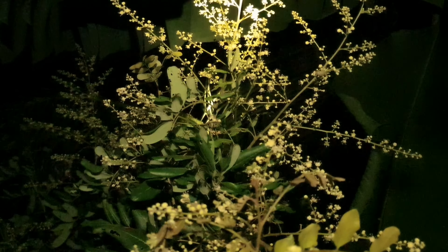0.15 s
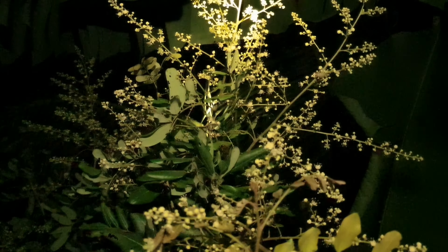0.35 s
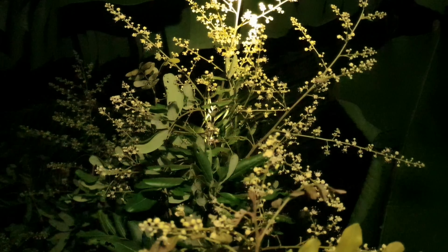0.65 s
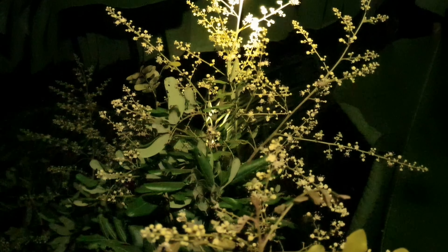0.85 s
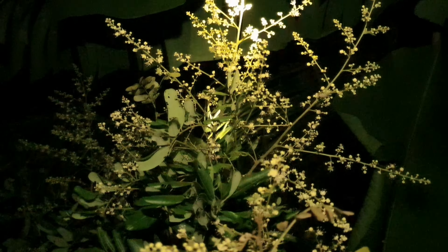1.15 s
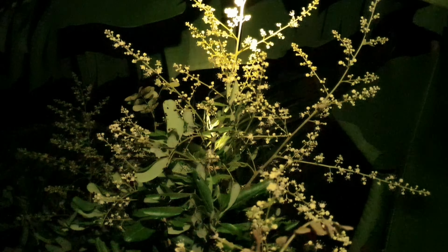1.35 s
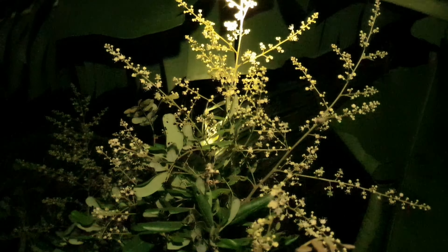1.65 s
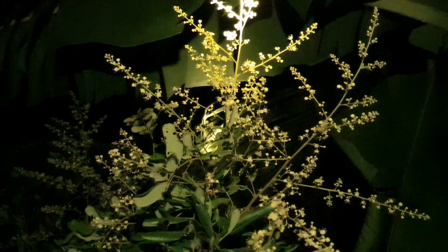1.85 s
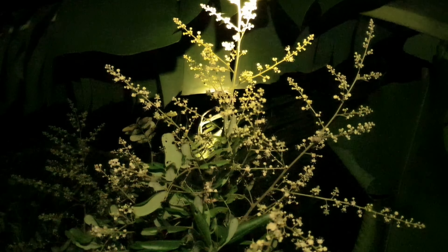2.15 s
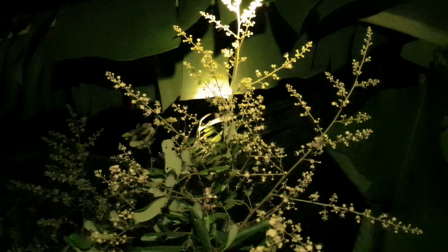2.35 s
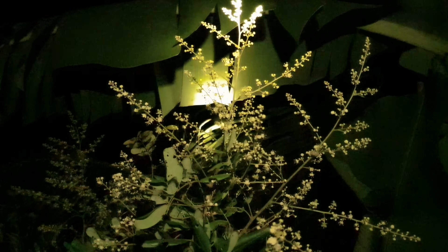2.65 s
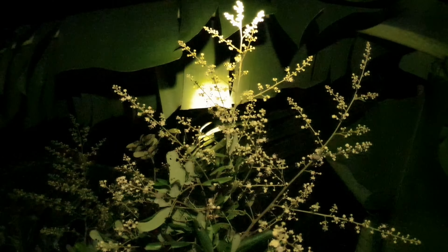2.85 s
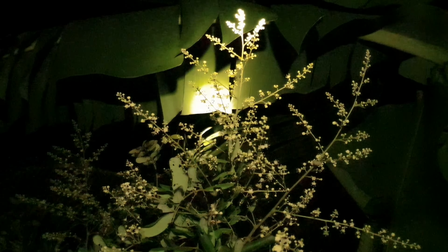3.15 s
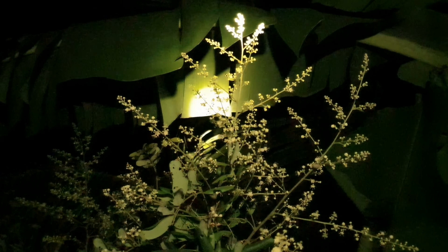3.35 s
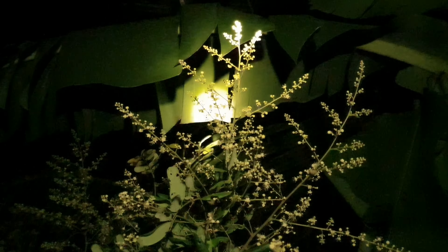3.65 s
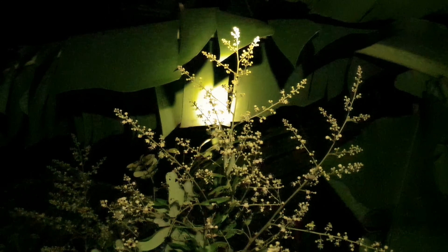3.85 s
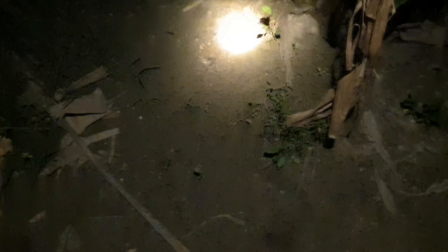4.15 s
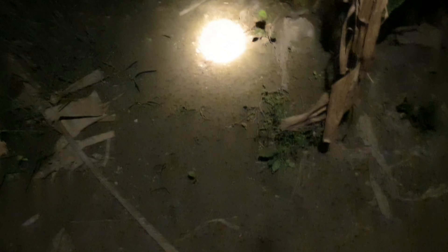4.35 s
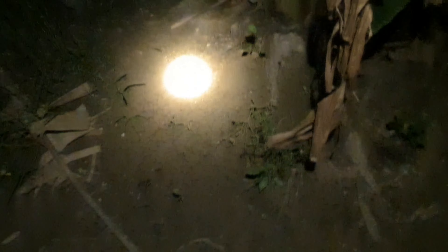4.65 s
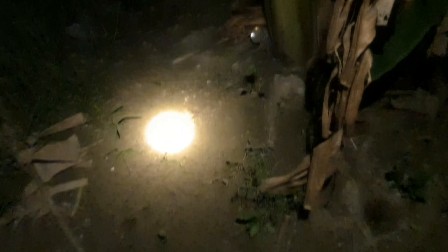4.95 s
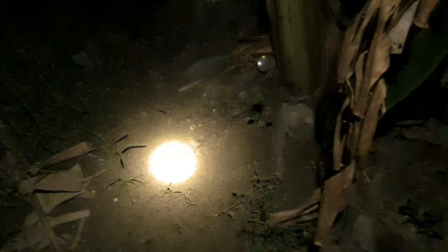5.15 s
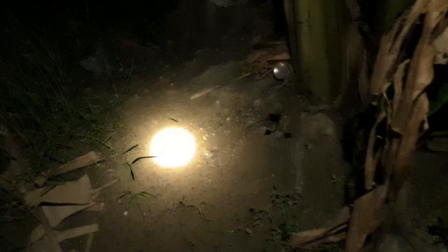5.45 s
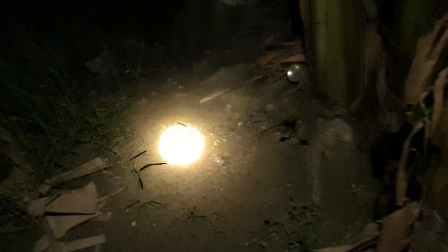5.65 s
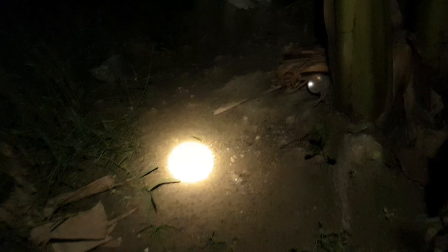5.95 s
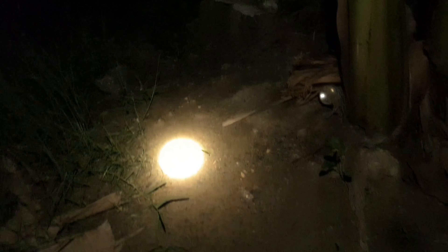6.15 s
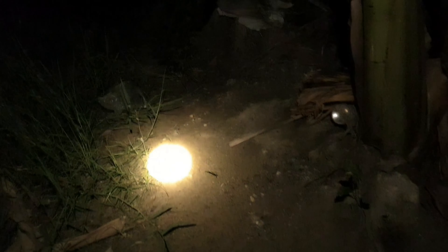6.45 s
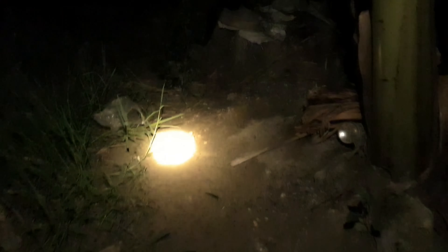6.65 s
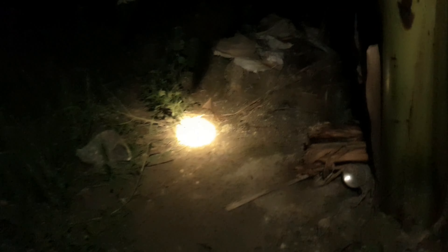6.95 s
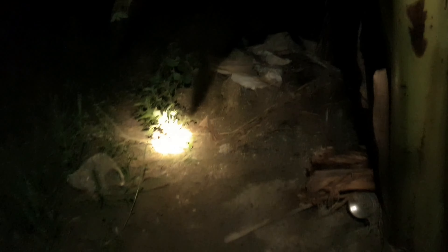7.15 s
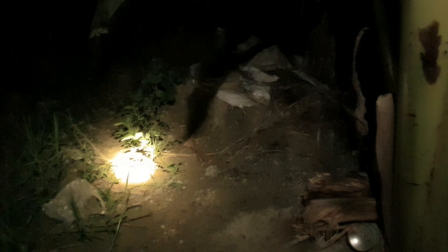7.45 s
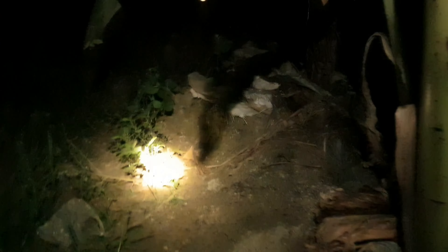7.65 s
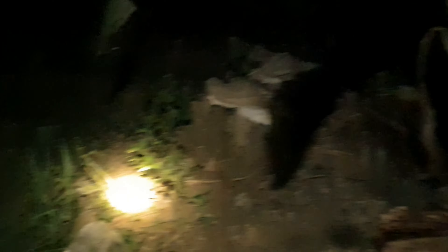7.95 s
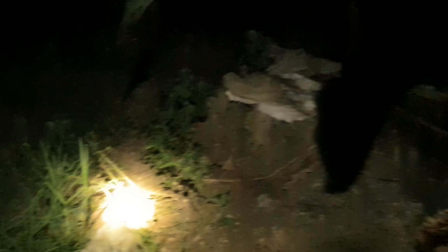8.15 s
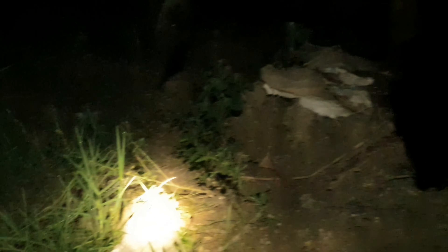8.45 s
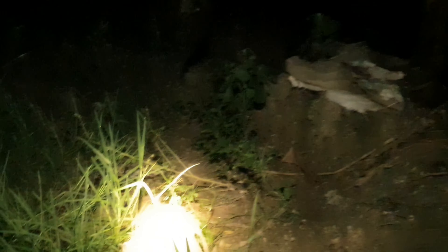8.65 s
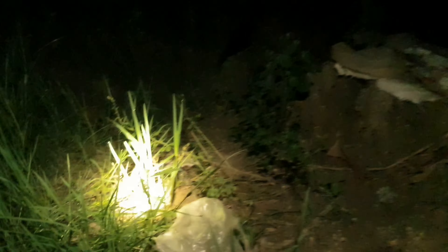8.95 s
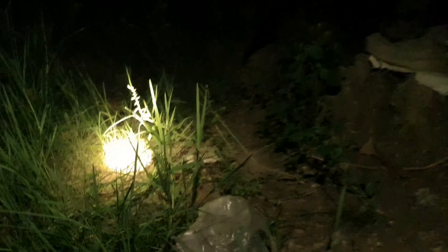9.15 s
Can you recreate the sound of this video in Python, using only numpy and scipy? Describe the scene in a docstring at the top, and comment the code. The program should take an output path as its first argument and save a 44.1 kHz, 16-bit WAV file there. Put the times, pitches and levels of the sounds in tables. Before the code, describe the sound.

Crickets trill and buzz outdoors at night over a distant engine; after a short gap, feet shuffle through dry leaves and a far dog barks.

```python
"""A garden at night, from two microphone spots. From the start, over night air, a far road and engine,
mole crickets trill near 2 kHz, coneheads buzz at 11 kHz and a katydid chirps at 7 kHz, all with their
wings; at 2 s another mole cricket briefly joins the chorus. At 4 s a short silence leads to the second
spot, where the chorus goes on and a small bush cricket lisps. Soon feet shuffle in dry leaves, snap
twigs and thud on the earth, and more mole crickets join in. Near 6 s and from 8.6 s a far dog barks."""
import sys
import numpy as np
from scipy import signal
from scipy.fft import rfft, irfft, next_fast_len
from scipy.io import wavfile
from scipy.ndimage import map_coordinates

SR = 44100
rng = np.random.default_rng(int(sys.argv[2]) if len(sys.argv) > 2 else 0)


def to_wav(sig):
    """Store sig (one row per channel, or 1-D mono) as 16-bit WAV at the path in sys.argv[1].

    Samples outside -1..1 are clipped; the rate is SR.
    """
    pcm = np.clip(np.atleast_2d(sig), -1, 1) * 32767
    pcm = np.round(pcm).astype(np.int16)
    wavfile.write(sys.argv[1], SR, pcm.T)  # frames by channels


N = 409688
TIME = np.arange(N) / SR


def gain_of(db):
    """Decibels to amplitude."""
    return 10 ** (np.asarray(db) / 20)


def unit_rms(x):
    """Scales to rms 1."""
    return x / np.sqrt(np.mean(x ** 2) + 1e-20)


def at_hz(points, hz):
    """Reads a table on a log-frequency axis."""
    f, value = np.transpose(points)
    return np.interp(np.log(hz + 1), np.log(f + 1), value)


def level(rows):
    """A curve (t/s, level/dB) as a gain for every sample."""
    return gain_of(np.interp(TIME, *np.transpose(rows)))


def colour(x, spectrum):
    """Filters x by a spectrum (f/Hz, gain/dB) and scales it to rms 1."""
    n = x.shape[-1]
    size = next_fast_len(n)
    gains = gain_of(at_hz(spectrum, np.fft.rfftfreq(size, 1 / SR)))
    return unit_rms(irfft(rfft(x, size) * gains, size)[..., :n])


def drift(per_s):
    """A smooth random curve of rms near 1 that changes about per_s times a second."""
    knots = rng.standard_normal(65536)
    coarse = TIME[::4 if per_s > 1000 else 32]
    return np.interp(TIME, coarse, map_coordinates(knots, [coarse * per_s], order=3, mode="wrap"))


def pan(balance_db):
    """Left and right microphone gains of mean power 1; positive is left."""
    return unit_rms(gain_of([[balance_db / 2], [-balance_db / 2]]))


def add(mix, s, sound):
    """Mixes a sound in at time s."""
    part = mix[..., round(s * SR):][..., :sound.shape[-1]]
    part += sound[..., :part.shape[-1]]


def foliage(x, t60, wet_db):
    """Leaves and trunks scatter a sound, differently for each microphone."""
    t = np.arange(SR // 2) / SR
    tail = rng.standard_normal((2, len(t))) * gain_of(-60 * t / t60)
    tail *= gain_of(wet_db) / np.linalg.norm(tail[0])
    tail[:, 0] += 1  # the direct path
    return signal.oaconvolve(x[None], tail / np.linalg.norm(tail[0]), axes=1)[:, :N]


# likeness of the two microphones: f/Hz, correlation
LIKENESS = [(25, .93), (60, .975), (125, .95), (250, .45), (500, -.4), (1000, -.3), (2000, -.15), (5000, 0)]


def ambience(spectrum):
    """Noise from all round: alike at both microphones only in the bass."""
    size = next_fast_len(N)
    left, other = rfft(rng.standard_normal((2, size)))
    same = np.clip(at_hz(LIKENESS, np.fft.rfftfreq(size, 1 / SR)), -1, 1)
    right = same * left + np.sqrt(1 - same ** 2) * other
    return colour(irfft(np.array([left, right]), size)[:, :N], spectrum)


# far engine from each spot: t/s, level/dB
ENGINE_LEVELS = [
    [(0, -48), (.7, -45), (1.5, -47.5), (2.5, -48.5), (3.3, -47), (4, -47.5)],
    [(4.08, -54), (4.3, -52), (4.6, -59.5), (5.2, -56.5), (6.3, -54.5), (7.4, -54), (9.29, -55)],
]
# its rumble at each spot: f/Hz, gain/dB
RUMBLE_SPECTRA = [
    [(20, -26), (35, -26), (50, -6), (68, -8.5), (85, 4), (105, -5.5), (135, -11.5), (180, -45), (300, -69)],
    [(20, -20), (35, -4), (48, -4.5), (58, 2.5), (70, 0.5), (90, -3), (120, -10), (180, -29), (300, -36)],
]


def engine(spot, firing_hz=59.8, waver_hz=.74):
    """A far engine: an unsteady firing note in a rumble that swells and eases."""
    turns = np.cumsum(firing_hz + waver_hz * drift(8)) / SR
    note_db = [-7, -.5][spot] + 2.5 * drift(6.7)
    note = gain_of(note_db) * unit_rms(np.sin(2 * np.pi * turns))
    rumble = gain_of(1.35 * drift(3.19)) * ambience(RUMBLE_SPECTRA[spot])
    return level(ENGINE_LEVELS[spot]) * (note + rumble)


# air round each spot: f/Hz, gain/dB
AIR_SPECTRA = [
    [(100, -5.5), (160, 0.5), (250, -7), (500, -8), (750, -19.5), (1100, -24), (1600, -25), (2700, -15),
     (4000, -23.5), (5000, -18), (5600, -47.5), (7000, -24.5), (12000, -30.5), (15700, -34.5)],
    [(100, -10), (160, -1.5), (250, -3), (500, -8.5), (750, -11), (1100, -13.5), (1600, -11.5), (2700, -5),
     (4000, -11), (5000, -8), (5600, -25), (8000, -4), (9000, -17), (12500, -35), (14400, -22.5),
     (15700, -21.5)],
]


def night_air(spot):
    """A faint, slightly wavering hush all round the microphones."""
    return gain_of([-51.5, -56][spot] + .8 * drift(9.4)) * ambience(AIR_SPECTRA[spot])


# far road: t/s, level/dB
ROAD_LEVEL = [(0, -55.5), (1.3, -55), (2, -60), (4, -61), (4.1, -89), (4.45, -73), (4.65, -68.5),
              (9.29, -65)]
# its murmur: f/Hz, gain/dB
ROAD_SPECTRUM = [(100, -18), (250, -10), (450, 1.5), (850, 0.5), (1100, -11), (1600, -12), (3000, -17),
                 (5000, -37)]


def road():
    """A far road murmurs, fainter at the second spot."""
    return level(ROAD_LEVEL) * ambience(ROAD_SPECTRUM)


def strokes(per_s, wander, jitter):
    """Phase 0-1 within a wing stroke whose pace wanders slowly and trembles."""
    return np.cumsum(per_s * (1 + wander * drift(2.5) + jitter * drift(60))) / SR % 1


# the burrow's horn, ringing near the wing pitch: f/Hz, gain/dB
BURROW_HORN = [(1400, -12), (1750, 0), (2080, -.5), (2210, 2), (2280, 0), (2350, -2.5), (2430, -11),
               (2600, -6), (3000, -20)]


def trill(per_s, hz, db, balance_db, wet_db, wander, jitter):
    """One mole cricket: each wing stroke rings a tone that holds, then sags, through the burrow's horn."""
    stroke_s, top, sag = .0074, 1.04, .14  # opening pitch and its fall are shares of hz
    age = strokes(per_s, wander, jitter) / per_s
    progress = np.minimum(age / stroke_s, 1)
    turns = hz * age * (top - sag * progress ** 2 / 3)
    tone = colour(np.sin(np.pi * progress) ** 2 * np.sin(2 * np.pi * turns), BURROW_HORN)
    scattered = foliage(signal.hilbert(tone, next_fast_len(N))[:N], t60=.18, wet_db=wet_db)
    microphones = (scattered * [[1], [1j]]).real  # a quarter wave apart
    return gain_of(db) * pan(balance_db) * unit_rms(microphones)


# burrows near each spot: stroke rate/Hz, wing f/Hz, relative level/dB, left-right/dB, echo/dB
NEAR_BURROWS = [
    [(117.1, 2190, -3.5, -1.5, -4), (116.2, 2190, -3.5, -20, 0), (139.3, 2200, -11, -12, 10),
     (111.4, 2200, -7, -4.5, 1), (123, 2160, -6, -4.5, 3)],
    [(118.1, 2175, -2.5, -5, -7), (120.2, 2180, -6.5, -6, -2), (106.4, 2200, -8, -2.5, -6),
     (115, 2140, -6.5, 4, -1), (122.3, 2090, -7, -3, 0)],
]
# whole chorus at each spot: t/s, level/dB before lift_db
TRILL_LEVELS = [
    [(0, -48), (.4, -50.5), (.8, -49), (1.5, -48.5), (3, -50), (3.5, -51), (3.7, -49), (4, -50)],
    [(4.08, -50.5), (4.33, -47.5), (4.42, -51.5), (4.66, -51.5), (4.8, -50.5), (4.95, -52), (5.35, -52),
     (5.55, -50.5), (6, -49), (6.55, -52), (6.82, -50), (7.1, -51.5), (9.29, -51)],
]


def mole_crickets(spot, lift_db=5.5):
    """Near singers wax and wane; far burrows merge into a band."""
    near = sum(gain_of(2 * drift(3)) * trill(*row, wander=.0035, jitter=.0035)
               for row in NEAR_BURROWS[spot])
    band = [(1500, -37.5), (1800, -16), (2000, -3), (2130, -3), (2260, -3.5), (2400, -8.5),
            (2550, -19.5), (3000, -66)]
    far = gain_of(-4.5) * colour(rng.standard_normal((2, N)), band) * pan(-2.8)
    return gain_of(lift_db) * level(TRILL_LEVELS[spot]) * unit_rms(unit_rms(near) + far)


# coneheads near each spot: stroke rate/Hz, relative level/dB, left-right/dB
NEAR_CONEHEADS = [
    [(150.2, 0, -13.5), (147, -14, -2)],
    [(139.3, 0, -13), (151, -5, 3)],
]
# those farther from each spot: f/Hz, gain/dB
FAR_BUZZ_SPECTRA = [
    [(8900, -59), (9500, -16.5), (10000, -3.5), (10500, -1), (11000, 1.5), (11600, -1), (12100, -8),
     (13000, -35), (13500, -48)],
    [(8900, -27), (9500, -14), (10000, -10), (10500, 0), (11000, -1), (11600, -3.5), (12100, -16),
     (12600, -28), (13500, -41)],
]
# near and far together at each spot: t/s, level/dB before lift_db
BUZZ_LEVELS = [
    [(0.05, -50), (0.17, -51.5), (0.32, -49.5), (.55, -50), (0.75, -51), (3.4, -50.5), (3.72, -50),
     (3.95, -51.5)],
    [(4.1, -54.5), (4.39, -58), (5.72, -58), (7.3, -57), (7.99, -54.5), (8.3, -56.5), (8.88, -57),
     (9.25, -55.5)],
]


def coneheads(spot, lift_db=5):
    """Each wing stroke is a scratchy falling sweep, mostly on the right; far singers blur into a hiss."""
    near = np.zeros((2, N))
    wing = [(8700, -35), (9100, -9), (9900, -4), (10400, 0), (11650, 0), (12150, -15), (12600, -10),
            (13050, -1), (13500, -28)]
    for per_s, db, balance_db in NEAR_CONEHEADS[spot]:
        stroke = strokes(per_s, wander=.002, jitter=.0036)
        hz = 11900 - 1800 * stroke + 450 * np.array([drift(3000), drift(3000)])
        scrape = np.sin(np.pi * stroke) * np.sin(2 * np.pi * np.cumsum(hz, 1) / SR)
        near += gain_of(db + .5 * drift(4)) * pan(balance_db) * colour(scrape, wing)
    far = colour(rng.standard_normal((2, N)), FAR_BUZZ_SPECTRA[spot]) * pan([-8, -1][spot])
    chorus = unit_rms(unit_rms(near) + gain_of([-2, 2][spot]) * far)
    return gain_of(lift_db) * level(BUZZ_LEVELS[spot]) * chorus


def repeats(first, end, per_s, db, length_s, spread_db, jitter_s, taper):
    """Envelope of a run of like calls at an even pace, each a little off in time and strength."""
    effort, times = np.zeros(N), np.arange(first, end, 1 / per_s)
    call = signal.windows.tukey(round(length_s * SR), taper)
    for s, (late, loud) in zip(times, rng.standard_normal((len(times), 2))):
        add(effort, max(s - length_s / 2 + jitter_s * late, 0), gain_of(db + spread_db * loud) * call)
    return effort


# near katydid: first chirp t/s, end t/s, chirp rate/Hz, relative level/dB
KATYDID_RUNS = [(0.055, 4.0, 9.44, 0), (4.098, 4.55, 9.9, 1), (4.785, 5.7, 10.3, -1.5),
                (5.85, 7.35, 10.2, -1), (7.458, 9.29, 9.06, .7)]
# its wing: f/Hz, gain/dB
KATYDID_WING = [(5900, -54), (6300, -9), (6900, -2.5), (7150, 8), (7380, -1), (7650, -9), (8400, -31)]
# its far neighbours: f/Hz, gain/dB
FAR_RASP = [(5700, -45), (6000, -14.5), (6400, -11), (6900, 2), (7200, -4.5), (7380, 3), (7650, -16.5),
            (8200, -40), (8900, -44)]


def katydid(chirp_db=-47.5):
    """Chirps about ten a second, each a run of uneven tooth strikes, over the rasp of its neighbours."""
    effort = sum(repeats(*run, length_s=.099, spread_db=.5, jitter_s=.002, taper=.95)
                 for run in KATYDID_RUNS)
    teeth = colour(rng.standard_normal((2, N)) * gain_of(1.2 * drift(350)), KATYDID_WING)
    neighbours = colour(rng.standard_normal((2, N)) * gain_of(1.2 * drift(60)), FAR_RASP)
    neighbours_db = np.where(TIME < SPOT_TIMES[1][0], -53, -51.2)
    return gain_of(chirp_db) * effort * teeth * pan(1.3) + gain_of(neighbours_db) * neighbours


# mole crickets just left of centre: start t/s, end t/s, level/dB, stroke rate/Hz, wing f/Hz
BRIEF_TRILLS = [(2.08, 2.62, -52, 116.3, 2200), (4.73, 5.04, -50, 116.1, 2300),
                (4.99, 5.42, -45.5, 117.3, 2150), (5.43, 5.63, -49.5, 115.6, 2080)]


def joining_mole_crickets():
    """Further singers each join the chorus for a few tenths of a second."""
    out = np.zeros((2, N))
    for start, end, db, per_s, hz in BRIEF_TRILLS:
        size = round((end - start) * SR)
        song = trill(per_s, hz, db, balance_db=1.5, wet_db=-4, wander=.0015, jitter=.0022)
        add(out, start, song[:, :size] * signal.windows.tukey(size, .4))
    return out


# bush cricket at the second spot: first lisp t/s, end t/s, lisp rate/Hz, relative level/dB
BUSH_CRICKET_RUNS = [(4.285, 4.7, 3.3, 0), (4.89, 6.1, 3.48, -3.5), (6.325, 7.8, 3.65, -.5),
                     (8.03, 9.29, 3.5, -.5)]


def bush_cricket(lisp_db=-65.5):
    """Soft narrow lisps near 9 kHz, three or four a second."""
    band = [(8200, -20), (8950, -7), (9350, 0), (9650, -4), (10200, -25)]
    hiss = colour(rng.standard_normal((2, N)), band)
    effort = sum(repeats(*run, length_s=.105, spread_db=2, jitter_s=.014, taper=.36)
                 for run in BUSH_CRICKET_RUNS)
    return gain_of(lisp_db) * hiss * effort


# feet in the leaves at the second spot: middle t/s, level/dB, half length/s, centre f/Hz
LEAF_SHUFFLES = [(4.724, -56.5, .098, 2960), (4.76, -61.5, 0.47, 360), (5.74, -54.5, 0.042, 1530),
                 (5.797, -58, 0.28, 1510), (6.504, -50.5, 0.078, 2970), (6.584, -56, 0.28, 1480),
                 (6.594, -60, 0.088, 3100), (6.653, -63.5, 0.18, 2760), (6.784, -49.5, 0.11, 1650),
                 (6.902, -53, 0.044, 480), (7.132, -51.5, 0.042, 1660), (7.695, -57, 0.096, 1420),
                 (7.798, -54, 0.033, 1360), (8.105, -52.5, 0.031, 1600), (8.445, -52.5, .045, 2020),
                 (9.162, -57.5, 0.52, 1500)]


def shuffles():
    """A sole scrapes softly through dry leaves."""
    out = np.zeros((2, N))
    crackle = rng.standard_normal((2, N)) * gain_of(2.3 * drift(260) + 1.1 * drift(45))
    for middle, db, half_s, hz in LEAF_SHUFFLES:
        start, size = middle - half_s, round(2 * half_s * SR)
        leaves = [(hz / 12, -17), (hz * .54, -13), (hz, 1), (hz * 1.3, -8), (hz * 3.8, -22),
                  (hz * 10, -30)]
        grains = crackle[:, round(start * SR):][:, :size]
        swell = signal.windows.hann(size)[:grains.shape[1]]
        add(out, start, gain_of(db) * colour(grains, leaves) * swell)
    return out


# twigs underfoot: t/s, level/dB, f/Hz, gain an octave up/dB
TWIG_SNAPS = [(4.575, -48, 1400, -1), (6.749, -45, 1300, -21), (6.764, -45, 1600, -17),
              (6.934, -49, 1400, -12), (7.129, -48, 1400, -14), (8.099, -47.5, 1480, -13)]


def twigs():
    """A twig breaks with one dry click, briefly scattered by the plants."""
    out, click = np.zeros((2, N)), signal.unit_impulse(256, "mid")
    for s, db, hz, treble_db in TWIG_SNAPS:
        wood = [(hz / 4, -16), (hz * .6, -8), (hz, 0), (hz * 1.2, -2), (hz * 2, treble_db),
                (hz * 3.2, treble_db - 6), (hz * 8, treble_db - 22)]
        snap = foliage(colour(click, wood), t60=.06, wet_db=2)
        add(out, s - len(click) / 2 / SR, gain_of(db) * snap)
    return out


# soft steps on the garden earth: t/s, level/dB, f/Hz, t60/s
FOOTFALLS = [(4.576, -33, 225, 0.027), (6.455, -47, 139, 0.058), (6.905, -35, 654, 0.043),
             (6.927, -44, 523, 0.041), (7.551, -47.5, 743, 0.074), (8.565, -55, 770, 0.12)]
# modes of one step: ratio to f, gain/dB
FOOTFALL_MODES = [(.49, -6), (.8, -5), (1, -0.5), (1.42, -18)]


def footfalls(attack_s=.0015):
    """A sole lands softly and rings a few low, quickly damped modes."""
    out, t = np.zeros(N), np.arange(SR // 4) / SR
    for s, db, hz, t60 in FOOTFALLS:
        ring = sum(gain_of(mode_db) * np.sin(2 * np.pi * hz * ratio * t)
                   for ratio, mode_db in FOOTFALL_MODES)
        add(out, s, gain_of(db - 60 * t / t60) * (1 - np.exp(-t / attack_s)) * ring)
    return foliage(out, t60=.27, wet_db=-1.5)


# dog far from the second spot:
# t/s, length/s, level/dB, top f/Hz, rise/s, share of pitch lost by the end, final hoarseness 0-1
DOG_BARKS = [(5.888, 0.13, -62, 860, 0.014, 0.2, .45), (6.008, 0.135, -59.5, 625, 0.015, .075, .4),
             (8.637, 0.155, -52, 555, 0.068, 0.18, .8), (9.06, 0.135, -59.5, 572, 0.078, 0.19, .5),
             (9.168, .085, -56, 850, 0.014, 0.26, .5)]
# its throat: f/Hz, gain/dB
DOG_THROAT = [(250, -31), (520, 1), (750, -2), (1050, 1), (1250, 4.5), (1480, -4.5), (1650, -8),
              (2000, -14), (3000, -35)]
# its breath: f/Hz, gain/dB
DOG_BREATH = [(400, -21), (820, -19), (950, -4), (1040, -8), (1140, 0), (1270, -18), (1450, -10),
              (1700, -20), (3000, -31)]


def dog(fade_db=-1.5, release_s=.016, flutter_db=3.5):
    """Yelps and short barks with an arch of pitch turn hoarse as they close, broken up by echoes."""
    out = np.zeros(N)
    for start, length, db, top_hz, rise_s, sag, hoarse in DOG_BARKS:
        t = np.arange(0, length, 1 / SR)
        opening = np.sin(np.pi / 2 * np.minimum(t / rise_s, 1))
        closing = np.maximum(t - rise_s, 0) / (length - rise_s)
        hz = top_hz * (.7 + .3 * opening) * (1 - sag * closing)
        tremble = (.015 * drift(261) + .013 * drift(68))[:len(t)]
        turns = np.cumsum(hz * (1 + tremble)) / SR
        folds = colour(sum(np.cos(2 * np.pi * k * turns) for k in range(1, 6)), DOG_THROAT)
        breath = colour(rng.standard_normal(len(t)), DOG_BREATH)
        rough = hoarse * closing
        voice = np.sqrt(1 - rough) * folds + np.sqrt(rough) * breath
        effort = opening ** 2 * gain_of(db + fade_db * closing) * np.minimum((length - t) / release_s, 1)
        add(out, start, effort * gain_of(flutter_db * drift(69)[:len(t)]) * voice)
    return foliage(out, t60=.17, wet_db=-3)


# the microphones' stay at each spot: start t/s, end t/s
SPOT_TIMES = [(0, 3.997), (4.075, 9.3)]


def scene():
    """Each spot has its own chorus; silence lies between them."""
    out = np.zeros((2, N))
    events = joining_mole_crickets() + katydid() + bush_cricket()
    events = events + shuffles() + twigs() + footfalls() + dog()
    for spot, (start, end) in enumerate(SPOT_TIMES):
        bed = mole_crickets(spot) + coneheads(spot) + engine(spot) + night_air(spot) + road()
        out += ((TIME >= start) & (TIME < end)) * (events + bed)
    return out


def record(dry):
    """The recorder's band limit at 15.8 kHz."""
    lowpass = signal.firwin(511, 15800, window=("kaiser", 9), fs=SR)
    return signal.oaconvolve(dry, lowpass[None], "same")


dry = scene()
out = record(dry)
to_wav(out)
```